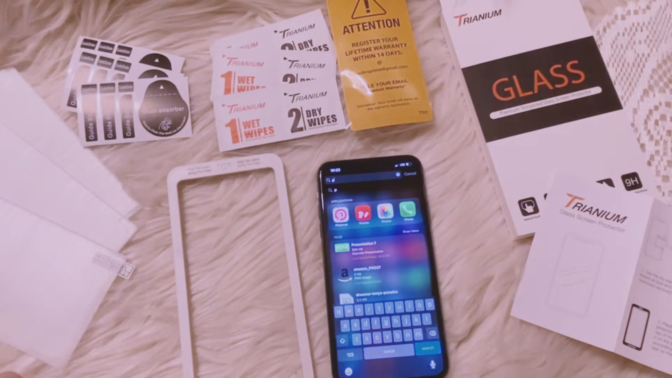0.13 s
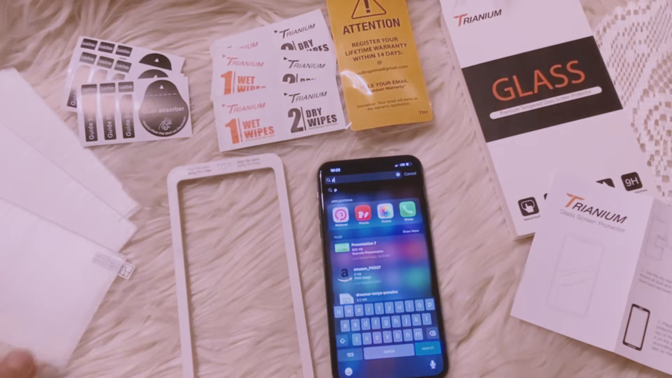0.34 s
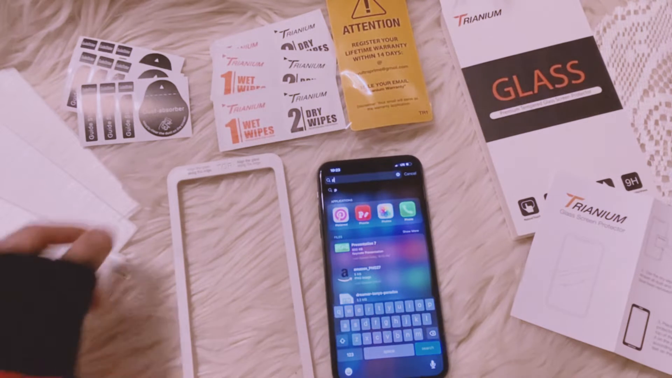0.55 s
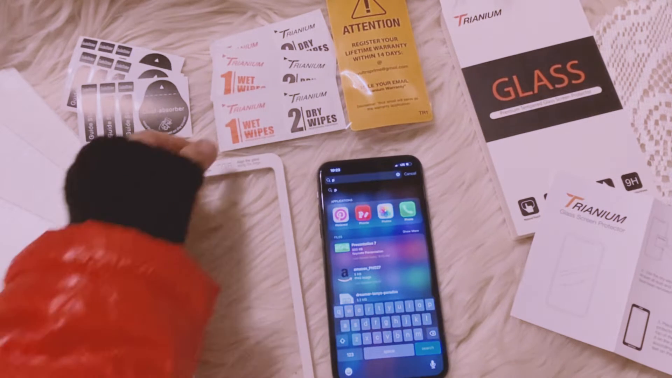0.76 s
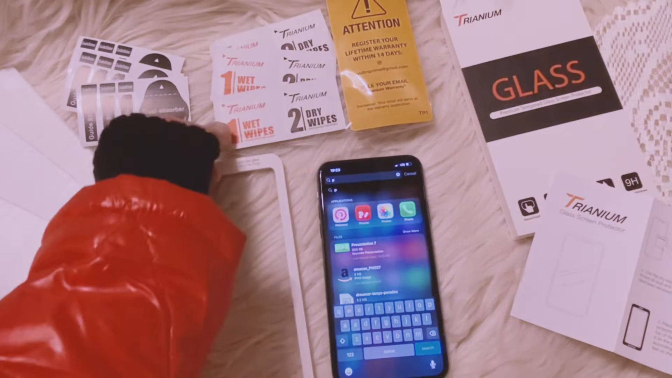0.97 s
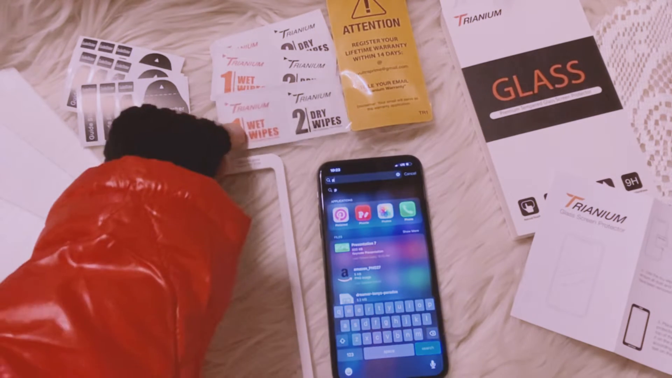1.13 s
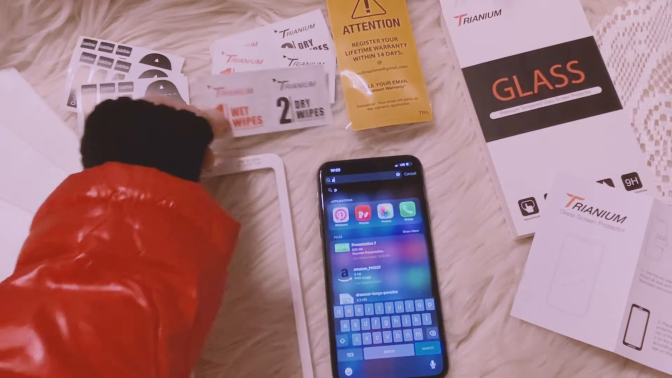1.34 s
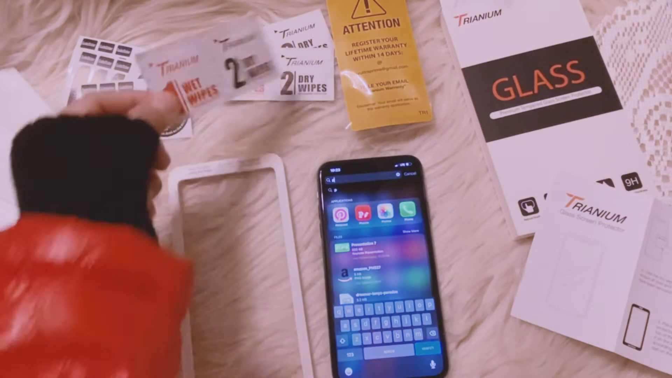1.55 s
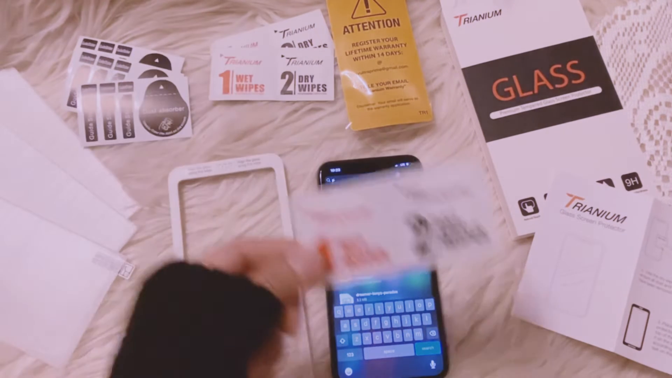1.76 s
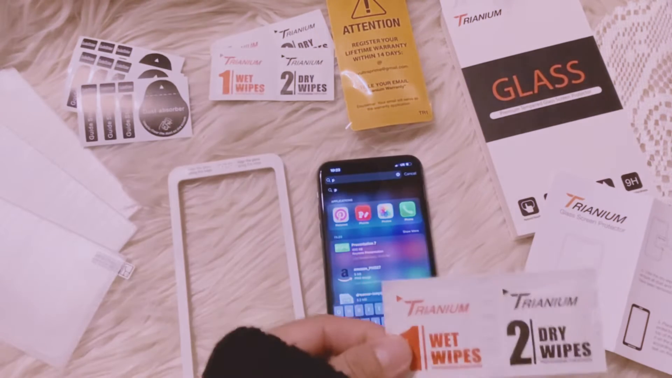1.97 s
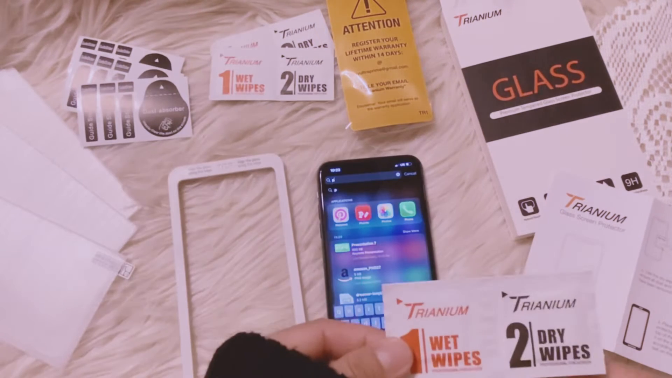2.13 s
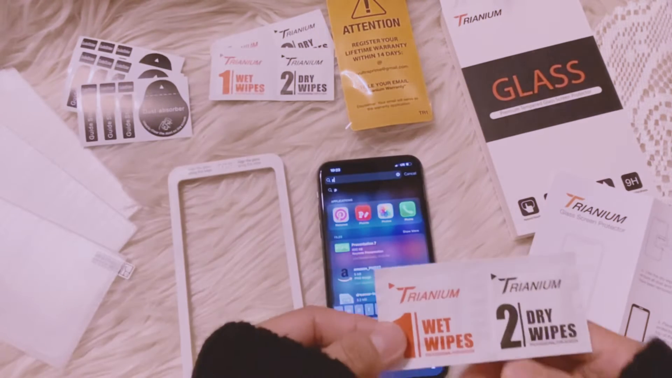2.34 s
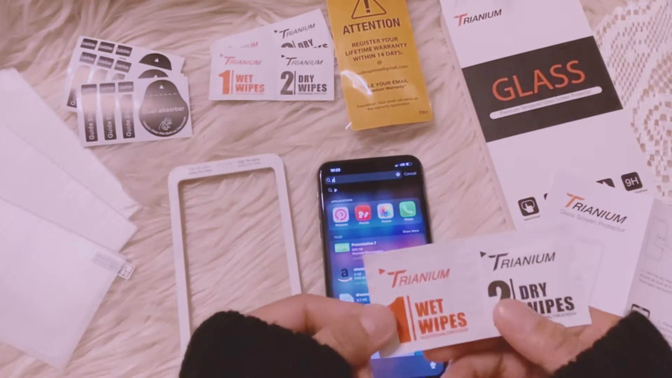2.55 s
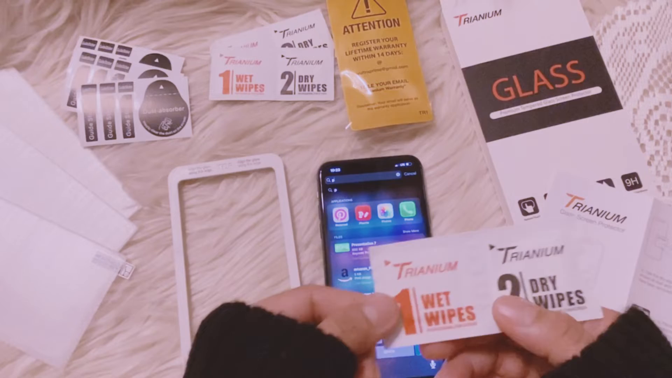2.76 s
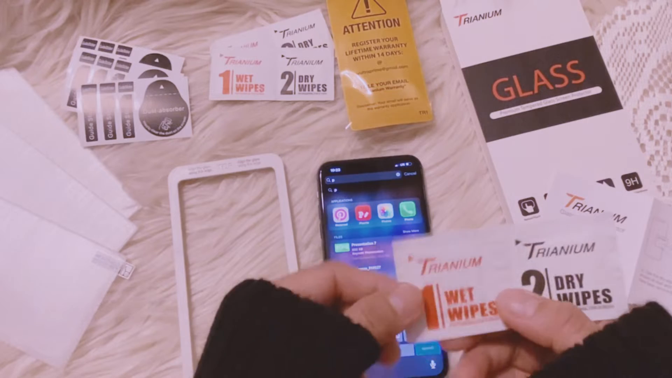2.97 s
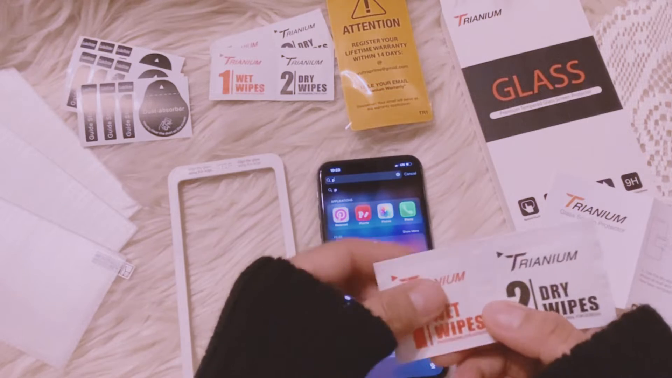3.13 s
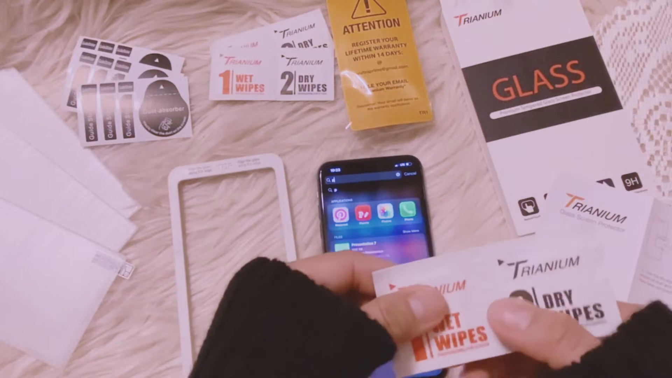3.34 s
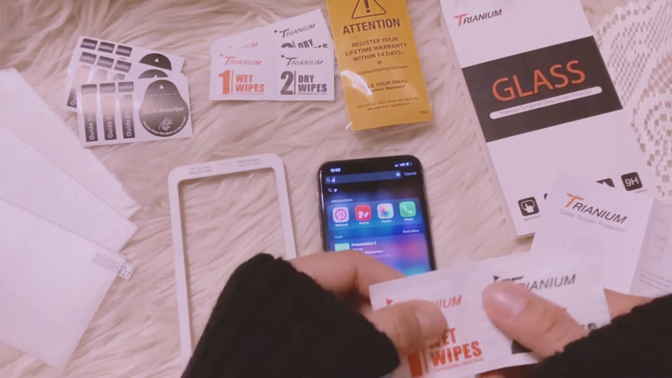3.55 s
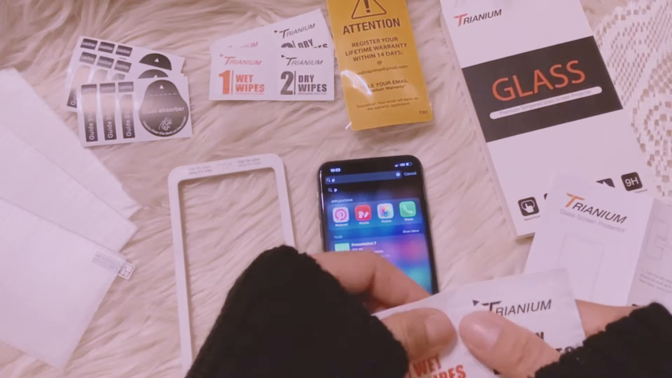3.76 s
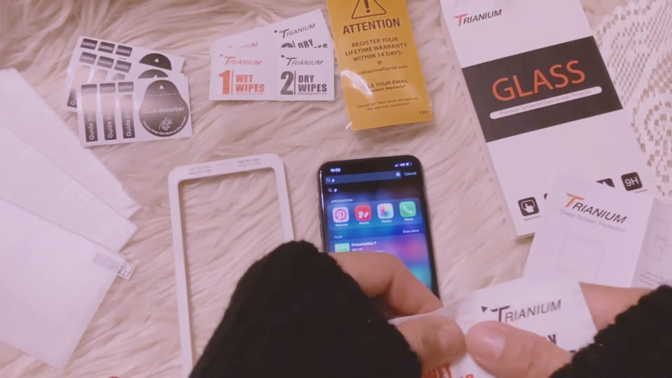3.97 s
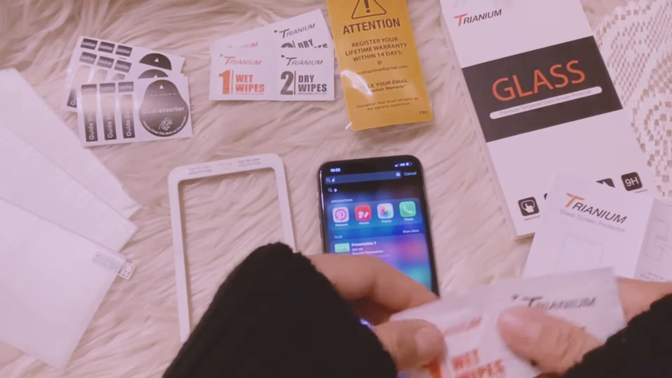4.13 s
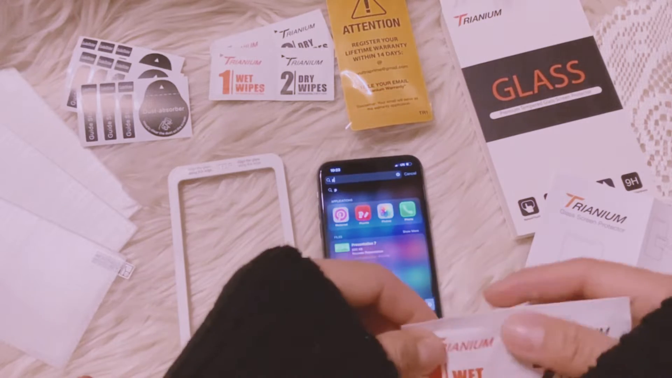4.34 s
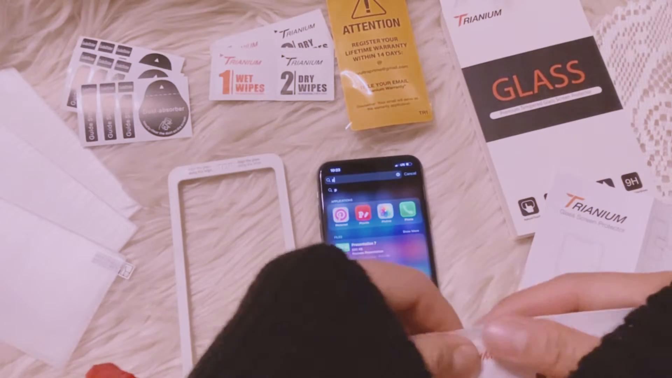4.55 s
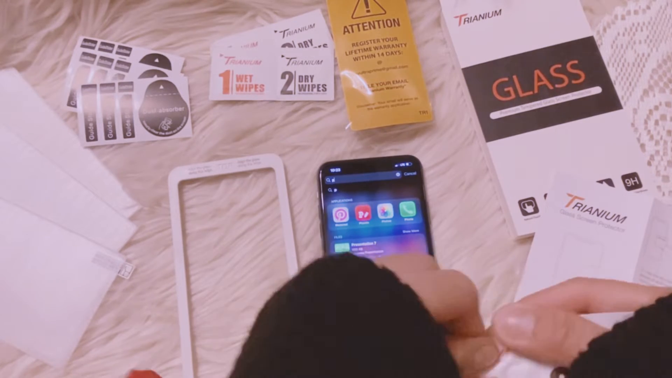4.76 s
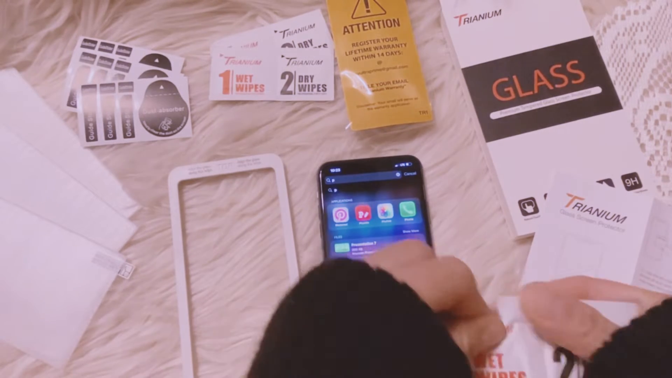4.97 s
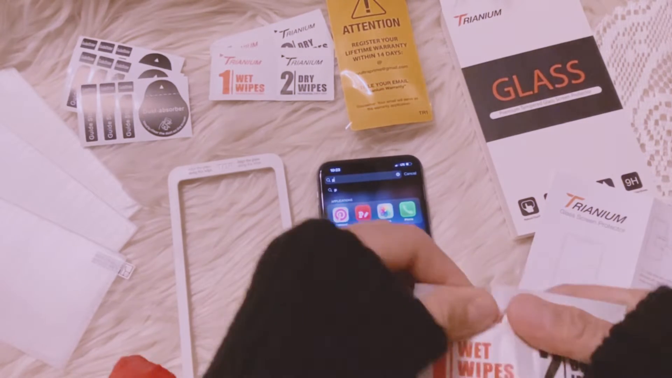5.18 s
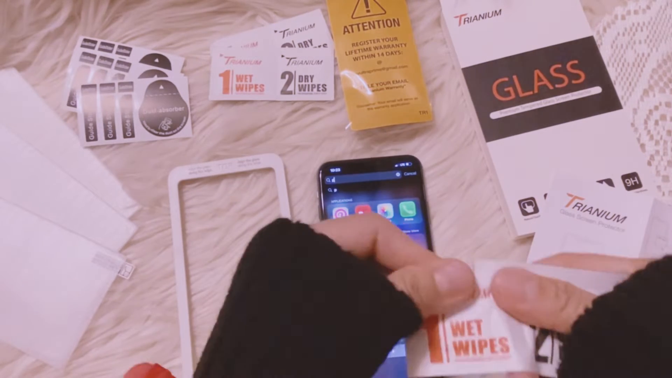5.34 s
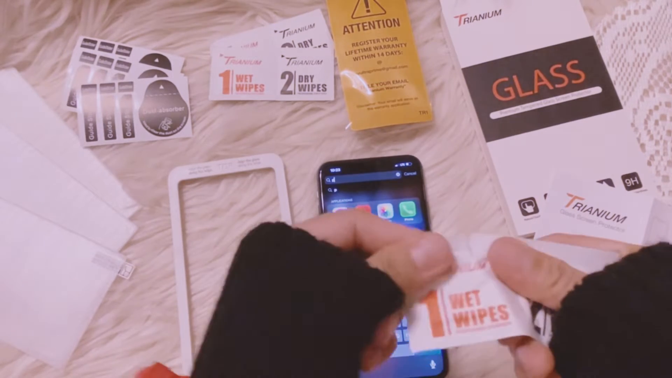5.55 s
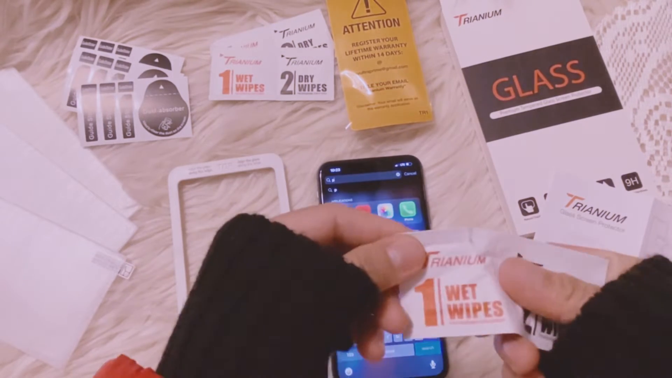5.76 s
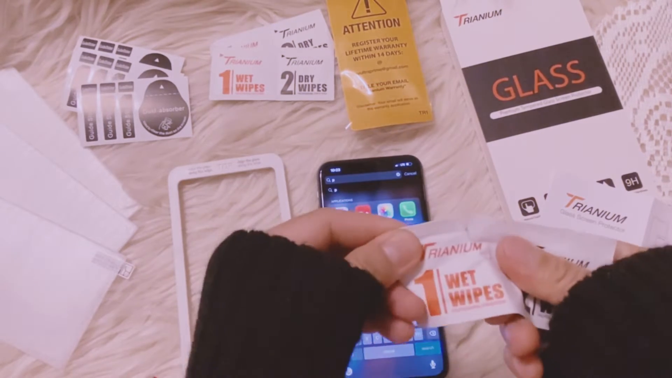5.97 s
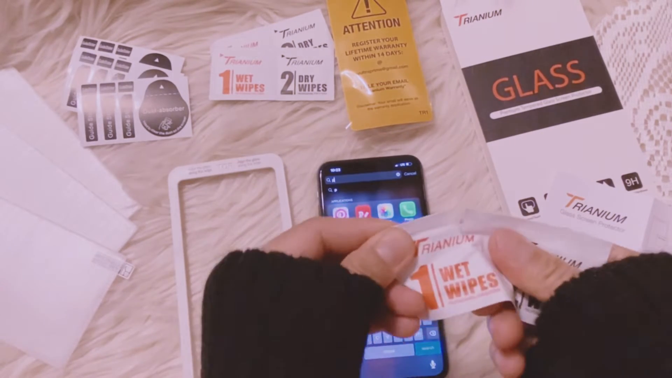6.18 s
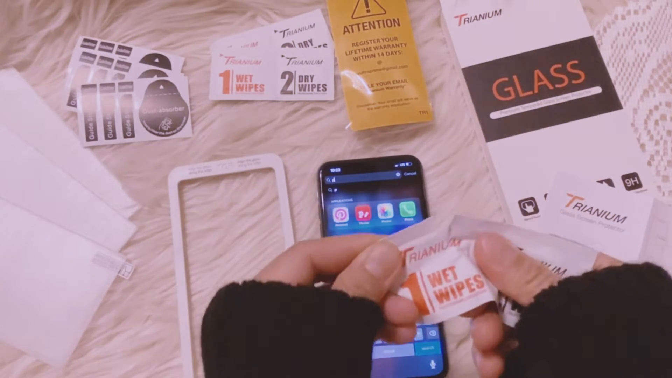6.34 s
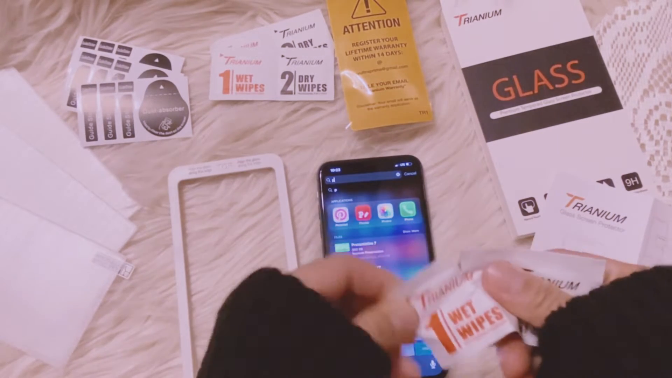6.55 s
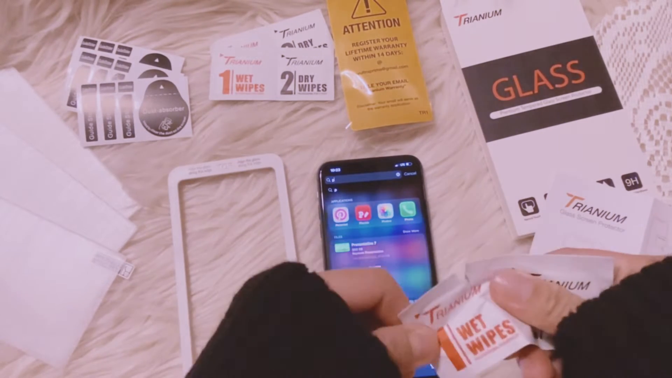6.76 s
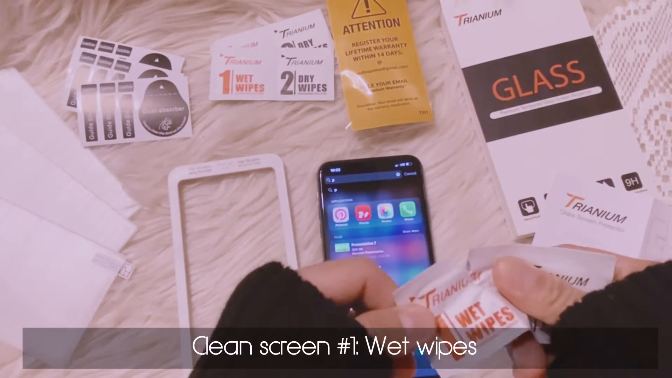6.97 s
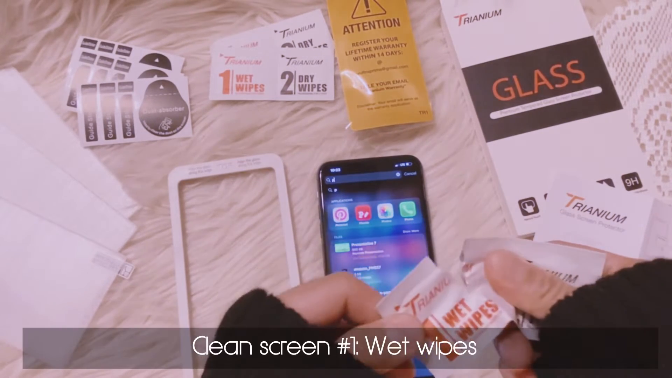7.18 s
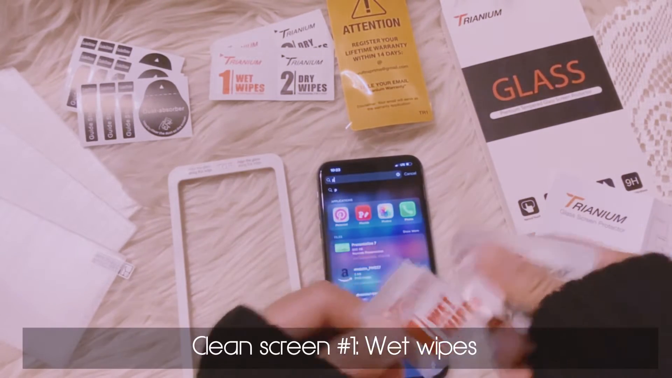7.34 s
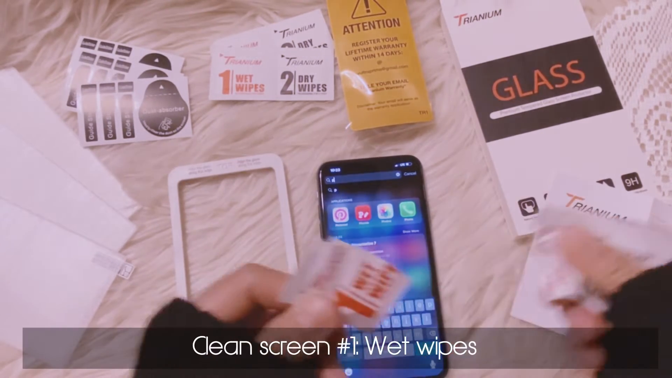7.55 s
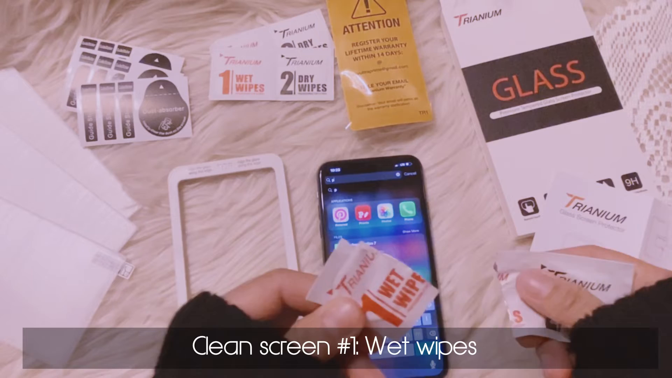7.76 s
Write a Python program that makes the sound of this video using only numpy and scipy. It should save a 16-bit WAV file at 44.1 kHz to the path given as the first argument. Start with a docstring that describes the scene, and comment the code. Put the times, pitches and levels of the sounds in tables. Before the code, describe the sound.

A quiet indoor space holds a low soft rumble and a very faint, slightly wavering mid-low tone throughout. It is nearly still until 0.3 s, when a sleeve and fingers rub softly; a light scrape at about 1.4 s and a fuller brush near 1.6 s mark a packet lifted from a fur rug. Gentle rustling follows. From 2.9 s both hands grip the foil: small crinkles, a few clearer clicks around 3.3-3.7 s, a group at 4.05 s. Sharp, dry snaps strike at 4.7 and 4.9-5.05 s, the strongest with short dull thumps, then another at 5.5 s. From 5.6 to 7 s come quieter, finer, bright crackles and rubbing. A low jolt swells near 7.1 s; at 7.35 s the seam rips in a very brief, loud burst. Crisp ticks at 7.6 s and light rustle end it. Close, with only a tiny diffuse tail.

```python
"""A quiet room rumbles with one thin, slightly wavering tone, low filtered noise and a sine;
close by, hands pick a foil sachet off a fur rug, bend it and rip it open.
Sleeves and fingers rustle (shaped noise), creases snap one by one (damped rings plus cracks),
big folds thump (short sagging sines), the seam tears in a burst (dense impulse runs)
and the pull jolts the air (low noise swells)."""
import sys
import numpy as np
from scipy import signal
from scipy.fft import rfft, irfft
from scipy.io import wavfile
from scipy.ndimage import uniform_filter1d

SR = 44100
rng = np.random.default_rng(int(sys.argv[2]) if len(sys.argv) > 2 else 0)


def store_pcm(level_fs):
    """Save levels as 16-bit WAV."""
    pcm = np.round(np.clip(level_fs, -1, 1) * 32767).astype(np.int16)
    wavfile.write(sys.argv[1], SR, np.atleast_2d(pcm).T)


N = 344421
MID_SIDE = np.array([[1], [-1]])  # sign of the side signal, left and right


# creases snapping: t/s, peak level/dB, panel f/Hz, crack level/dB re panel ring
CREASE_SNAPS = [(2.9743, -27.5, 2950, 0), (3.2887, -22.5, 3080, -2), (3.597, -18.5, 2520, -4.5),
                (3.6429, -20, 2400, -32), (3.665, -32.5, 2450, -30), (3.87, -34.5, 2800, -13),
                (4.0415, -22, 2450, -15), (4.0448, -17.5, 1720, -28), (4.045, -7.5, 4600, -40),
                (4.0539, -21.5, 2320, -28), (4.235, -32, 2360, -23), (4.4194, -18.5, 2380, -34),
                (4.593, -40, 1180, -27), (4.6693, -11.5, 1710, -55), (4.678, -24, 820, -40),
                (4.6908, -1, 3450, 1), (4.793, -18.5, 4050, 5), (4.874, -38, 2090, -28),
                (4.8955, -16.5, 3050, -8), (4.9159, -9.5, 2780, -7), (4.9732, -4.5, 1770, 1.5),
                (5.0268, 3, 3260, 2), (5.062, -17, 2900, 7), (5.17, -27.5, 1670, -30),
                (5.1786, -23, 2300, -8), (5.183, -21.5, 2100, -25), (5.194, -28, 2220, -25),
                (5.213, -29, 1560, -23), (5.417, -24.5, 2240, -33), (5.4679, -6.5, 2330, -52),
                (5.5161, -28.5, 1640, -23), (5.5451, -20, 2930, -23), (5.622, -28.5, 1670, -21),
                (5.75, -31, 1840, -25), (5.765, -32.5, 3150, -29), (5.782, -28, 1220, 1.5),
                (5.868, -29, 6900, 21), (5.933, -39, 2320, -20), (5.942, -37, 2420, -20),
                (5.974, -35.5, 6660, -12), (5.988, -40.5, 1970, -22), (6.0205, -33.5, 6700, 16),
                (6.084, -42.5, 1880, -18), (6.256, -27.5, 6800, 8), (6.445, -32, 4200, -15),
                (6.4547, -28, 2070, -20), (6.5617, -22.5, 1470, 0), (6.5746, -33, 1990, -25),
                (6.686, -34, 4230, 5), (6.865, -31, 5700, 17), (6.898, -32, 6910, 27),
                (6.952, -40, 6500, 21), (7.008, -35, 6500, 14), (7.026, -39, 6500, 12),
                (7.0478, -16.5, 6460, 2), (7.0767, -45, 5200, -21), (7.079, -25.5, 2410, -25),
                (7.102, -21, 2630, -24), (7.136, -22, 6700, 13), (7.213, -36, 6000, 12),
                (7.235, -27.5, 6170, 15), (7.285, -29, 6500, 21), (7.3066, -21.5, 3500, -2),
                (7.3478, 0.5, 4560, 4), (7.361, -6.5, 2090, 10), (7.6057, -14, 3940, 8),
                (7.639, -20, 3440, 9), (7.6455, -20.5, 4840, 12), (7.648, -14, 7450, 8)]
CREEP_LEAD_S, CREEP_SHARE, CREEP_RISE_S = 0.003, 0.33, 0.00065
RING_T60_S, RING_DB_PER_DOUBLING = 0.0041, 48  # T60 of a 0 dB snap; doubles per this many dB softer
UPPER_HZ, UPPER_DB, UPPER_DB_PER_CRACK_DB = 6530, -0.5, 0.65  # small high panel in every snap


def snaps():
    """Each crease creeps, then flips: its panel rings briefly, a crack goes on top."""
    length = 2048
    out, t = np.zeros((2, N + length)), np.arange(length) / SR
    noises = rng.standard_normal((len(CREASE_SNAPS), 3, length))
    after_flip = np.maximum(t - CREEP_LEAD_S, 0)
    creep = CREEP_SHARE * np.exp((t - CREEP_LEAD_S) / CREEP_RISE_S)
    onset = np.where(t < CREEP_LEAD_S, creep, 1)
    for (t_s, peak_db, panel_hz, crack_db), noise in zip(CREASE_SNAPS, noises):
        t60_s = RING_T60_S * 2 ** (-peak_db / RING_DB_PER_DOUBLING)
        fade = np.exp(-np.log(1000) * after_flip / t60_s) * onset
        # splinters come from scattered spots: the two sides differ a little
        scattered = noise[0] + 0.26 * noise[1] * MID_SIDE
        splinter = band(scattered * fade, panel_hz / 2.6, min(1.81 * panel_hz, 8000))
        crack = band(noise[2] * fade, 7500, 15500, order=3)
        x = ring(after_flip, panel_hz, t60_s) + 0.96 * splinter / np.abs(splinter).max()
        upper_db = UPPER_DB + UPPER_DB_PER_CRACK_DB * crack_db
        x = x + undb(upper_db) * ring(after_flip, UPPER_HZ, 0.61 * t60_s)
        # a thin panel moves no air in the bass
        x = band(x, panel_hz / 2.64, 16000, order=3)
        x = x + undb(crack_db) * crack / np.abs(crack).max()
        i = int((t_s - CREEP_LEAD_S) * SR)
        out[:, i:i + length] += undb(peak_db) * x / np.abs(x).max()
    return out[:, :N]


# foil scraping, crumpling or ripping:
# peak t/s, 16 dB rise/s, 16 dB fall/s, level/dB, pitch f/Hz, treble level/dB re mid band
RIP_RUNS = [ (1.385, 0.052, 0.09, -43.5, 1460, -2), (1.446, 0.11, 0.0059, -46.5, 6740, 6.5),
            (3.162, 0.018, 0.013, -44.5, 2550, -12), (4.793, 0.016, 0.037, -42, 3350, 3.5),
            (4.972, 0.016, 0.0085, -29, 2620, -18), (5.028, 0.028, 0.0067, -31.5, 3220, -5),
            (5.19, 0.074, 0.083, -46, 2160, 0), (5.544, 0.033, 0.16, -44.5, 3220, -1.5),
            (5.788, 0.015, 0.038, -42, 2730, -3.5), (6.451, 0.07, 0.054, -41, 1680, -4.5),
            (6.567, 0.026, 0.04, -41, 2800, -25), (7.08, 0.045, 0.073, -38.5, 4650, -28),
            (7.348, 0.032, 0.0058, -32.5, 5250, 2), (7.349, 0.0015, 0.011, -14.5, 3600, 1.5),
            (7.362, 0.0058, 0.0024, -13.5, 3400, -19), (7.368, 0.0024, 0.072, -37, 3450, -11), ]


def rip():
    """Runs of fibre cracks that swell and die, over the flap of the sachet body."""
    cracks = pair(lambda: unit(grains(4000, 2.95)), 0.62)
    out = np.zeros((2, N))
    for peak_s, rise_s, fall_s, level_db, pitch_hz, treble_db in RIP_RUNS:
        start_s, end_s = peak_s - rise_s, peak_s + 2 * fall_s
        a, b = int(start_s * SR), int(end_s * SR)
        swell_db = np.interp(np.arange(a, b) / SR, [start_s, peak_s, end_s], [-16, 0, -32])
        run = cracks[:, a:b]
        mids = unit(band(run, pitch_hz / 2.2, min(2.0 * pitch_hz, 8000)))
        treble = undb(treble_db) * unit(band(run, 4840, 12600))
        # the harder the pull, the more the whole sachet flaps
        body = undb(0.31 * level_db) * unit(band(run.mean(axis=0), 333, 750))
        out[:, a:b] += undb(level_db + swell_db) * (mids + treble + body)
    return out


# sachet body as a big fold gives way: t/s, peak level/dB, starting f/Hz
FOLD_THUMPS = [(2.974, -34.5, 513), (4.0451, -32.5, 445), (4.4199, -24.5, 225), (4.6698, -23, 855),
               (4.6909, -26, 430), (4.9737, -18, 636), (5.027, -16.5, 565), (5.063, -31, 275),
               (5.183, -30.5, 440), (6.4539, -33, 560), (6.575, -27.5, 410), (7.102, -32, 453),
               (7.3468, -15.5, 384), (7.3615, -18.5, 690)]
THUMP_FADE_S, THUMP_SAG_PER_S = 0.00069, 11.6  # 1/e fade; exponential pitch sag rate


def thumps():
    """A dull, short swing whose pitch sags."""
    length = 2048
    out, t = np.zeros(N + length), np.arange(length) / SR
    sagging_t = (1 - np.exp(-THUMP_SAG_PER_S * t)) / THUMP_SAG_PER_S
    for t_s, peak_db, start_hz in FOLD_THUMPS:
        x = np.sin(2 * np.pi * start_hz * sagging_t) * t * np.exp(-t / THUMP_FADE_S)
        i = int(t_s * SR)
        out[i:i + length] += undb(peak_db) * x / np.abs(x).max()
    return out[:N]


SETTLE_DB, SETTLE_DB_PER_SNAP_DB, SETTLE_FADE_S = -39, 0.5, 0.016  # SETTLE_DB: after a 0 dB snap
STRAIN_DB, STRAIN_RISE_S = -3, 0.0083  # level re settling


def settling():
    """Rustle gain as foil strains towards a snap and settles after, more around a loud one."""
    def fade(x, tau_s):
        """Exponential decay, as the motion dies."""
        return signal.lfilter([1], [1, -np.exp(-1 / (tau_s * SR))], x)

    kicks = np.zeros(N)
    t_s, peak_db = np.transpose(CREASE_SNAPS)[:2]
    kicks[(t_s * SR).astype(int)] = undb(SETTLE_DB + SETTLE_DB_PER_SNAP_DB * peak_db)
    strain = fade(kicks[::-1], STRAIN_RISE_S)[::-1]
    return fade(kicks, SETTLE_FADE_S) + undb(STRAIN_DB) * strain


# cloth and skin sliding: t/s, level/dB
RUB_LEVEL = [(0, -73), (0.24, -72), (0.32, -57), (0.45, -48.5), (1.25, -63.5), (1.265, -55.5),
             (1.65, -47.5), (2.17, -58.5), (2.38, -54.5), (2.61, -63.5), (2.74, -56.5), (3.1, -58.5),
             (3.26, -67), (3.3, -55), (3.36, -59.5), (3.4, -52.5), (3.48, -63.5), (3.57, -54), (3.71, -55),
             (3.76, -50), (3.81, -56.5), (3.92, -48), (3.95, -53.5), (4.12, -47), (4.2, -59.5), (4.27, -49),
             (4.62, -55), (4.8, -51.5), (5.32, -51.5), (5.64, -49), (5.71, -57.5), (5.83, -56), (6.08, -61),
             (6.59, -47), (6.67, -59.5), (7.25, -63), (7.62, -55.5), (7.81, -63)]
# hiss spectrum: f/Hz, relative density level/dB
RUB_COLOUR = [(350, -1), (600, -1.5), (926, -5), (2020, -6), (3360, -5.5), (5840, -6.5), (7260, -6.5),
              (8000, -4), (10400, -89)]
# rustle treble against the foil patches: t/s, level/dB
TREBLE_LEVEL = [(0, -11), (0.4, -4), (3.3, -7), (3.7, -7.5), (5.0, -5.5), (5.8, -14), (6.1, 0.5),
                (6.6, -3.5), (7.0, 8.5), (7.5, -4.5), (7.81, -1.5)]
# treble spectrum: f/Hz, relative density level/dB
AIR_COLOUR = [(7000, -11), (7700, -6.5), (12000, 7.5), (14300, 5), (15000, -44)]
# foil panel centres: f/Hz
PANELS_HZ = (750, 1170, 1830, 2860, 4470, 6900)
GRIP_S, TICKS_DB = 2.9, -4  # both hands hold the foil from GRIP_S on; ticks re patches


def rustle():
    """Sliding fibres hiss; once the foil is gripped, the hiss turns patchier and tiny creases tick."""
    grip = np.arange(N) > GRIP_S * SR
    hiss = pair(lambda: unit(shape(rng.standard_normal(N), RUB_COLOUR)), 0.16)
    hiss = hiss * undb([[-1.5], [1.0]])
    # different panels of the foil sing in turn
    log_f, spec = np.log(np.fft.rfftfreq(N, 1 / SR) + 1), rfft(hiss)
    patches, ticks = 0, 0
    for one_panel in np.eye(len(PANELS_HZ)):
        share = np.interp(log_f, np.log(PANELS_HZ), one_panel)
        patches = patches + irfft(spec * share, N) * undb((0.9 + 1.95 * grip) * walk(22))
    for hz in PANELS_HZ[1:]:
        ticks = ticks + unit(band(grains(70, 3.3), hz / 1.47, hz * 2.5)) * undb(2.6 * walk(9.6))
    air = unit(shape(rng.standard_normal(N), AIR_COLOUR))
    mids = unit(patches) + grip * undb(TICKS_DB) * unit(ticks)
    level = np.hypot(undb(curve(RUB_LEVEL)), settling())
    flicker = undb((0.86 + 0.94 * grip) * walk(30))
    return level * flicker * (mids + undb(curve(TREBLE_LEVEL)) * air)


# hands jolting the air and table: t/s, level/dB, hold/s
HAND_JOLTS = [(7.09, -38, 0.075), (7.354, -36, 0.0055), (7.66, -46.5, 0.026)]
JOLT_RISE_DB_PER_S, JOLT_FALL_DB_PER_S = 600, 138


def jolt():
    """Low, uneven wobble as the hands pull apart: a quick swell, a hold, a slower fade."""
    t = np.arange(N) / SR
    swell = 0
    for t_s, level_db, hold_s in HAND_JOLTS:
        rise_db = JOLT_RISE_DB_PER_S * np.maximum(t_s - t, 0)
        fall_db = JOLT_FALL_DB_PER_S * np.maximum(t - t_s - hold_s, 0)
        swell = swell + undb(level_db - rise_db - fall_db)
    return swell * unit(band(rng.standard_normal(N), 47, 114))


# rumble spectrum: f/Hz, relative density level/dB
ROOM_COLOUR = [(25, -68), (49, 4.5), (107, -7), (134, 0), (167, -9), (388, -11.5), (519, -16), (659, -22),
               (1160, -33), (1500, -33.5), (1950, -40), (3300, -120)]
# rumble left-right likeness: f/Hz, correlation
ROOM_LIKENESS = [(60, 0.89), (150, 0.84), (300, 0.44), (650, -0.51), (1500, 0.29)]
ROOM_DB = -50.5
TONE_HZ, TONE_PEAK_DB = 528, -54.5  # centres of slow random wander
TONE_LEFT_RE_RIGHT_DB, TONE_RIGHT_PHASE_RAD = -7, 2.09


def room():
    """Rumble, alike in the bass and less alike higher up, and a thin tone of some appliance."""
    log_f = np.log(np.maximum(np.fft.rfftfreq(N, 1 / SR), 1))
    hz, correlation = np.transpose(ROOM_LIKENESS)
    like = np.clip(np.interp(log_f, np.log(hz), correlation), -1, 1)
    mid, side = (rfft(shape(rng.standard_normal(N), ROOM_COLOUR)) for _ in range(2))
    rumble = irfft(np.sqrt(1 + like) * mid + np.sqrt(1 - like) * side * MID_SIDE, N)
    phase = 2 * np.pi * np.cumsum(TONE_HZ + 1.465 * walk(3)) / SR
    tone = np.sin(phase + np.array([[0], [TONE_RIGHT_PHASE_RAD]]))
    tone = tone * undb(TONE_LEFT_RE_RIGHT_DB / 2 * MID_SIDE)
    rumble = undb(ROOM_DB + 0.5 * walk(1.78)) * unit(rumble)
    return rumble + undb(TONE_PEAK_DB + 2.14 * walk(13)) * tone


def undb(db):
    """Decibels to gain."""
    return 10 ** (np.asarray(db) / 20)


def unit(x):
    """Scale to rms 1."""
    return x / np.sqrt(np.mean(x ** 2))


def band(x, lo_hz, hi_hz, order=2):
    """Butterworth band-pass."""
    sos = signal.butter(order, [lo_hz, min(hi_hz, .45 * SR)], "band", fs=SR, output="sos")
    return signal.sosfilt(sos, x)


def shape(x, table):
    """Colour a steady noise by (f/Hz, level/dB) points."""
    hz, db = np.transpose(table)
    f = np.maximum(np.fft.rfftfreq(x.shape[-1], 1 / SR), 1)
    gain = undb(np.interp(np.log(f), np.log(hz), db, left=-90, right=-90))
    return irfft(rfft(x) * gain, x.shape[-1])


def curve(table):
    """A (t/s, value) table on the sample grid."""
    return np.interp(np.arange(N) / SR, *np.transpose(table))


def walk(rate_hz):
    """Random levels, one per 1 / rate_hz, smoothed twice; rms near 1."""
    k = int(SR / rate_hz)
    steps = np.repeat(rng.standard_normal(N // k + 1), k)
    return unit(uniform_filter1d(uniform_filter1d(steps, k), k)[:N])


def grains(per_s, scatter_db):
    """Random impulses with a tail of louder ones."""
    size = np.minimum(rng.exponential(size=N), 4)
    hits = rng.random(N) < per_s / SR
    return hits * rng.choice([-1, 1], N) * undb(scatter_db * size)


def ring(t, hz, t60_s):
    """One damped swing, peak 1."""
    x = np.sin(2 * np.pi * hz * t) * np.exp(-np.log(1000) * t / t60_s) * (1 - np.exp(-3 * hz * t))
    return x / np.abs(x).max()


def pair(make, likeness):
    """Two channels from a sound maker called twice, with the given correlation."""
    mid = np.sqrt((1 + likeness) / 2) * make()
    return mid + np.sqrt((1 - likeness) / 2) * make() * MID_SIDE


TAIL_DB, TAIL_T60_S = -24, 0.05


def scene():
    """Foil sounds get a short diffuse tail from nearby surfaces; rustle, jolts and room join dry."""
    foil = snaps() + thumps() + rip()
    t = np.arange(8192) / SR
    tail = rng.standard_normal((2, 8192)) * np.exp(-np.log(1000) * t / TAIL_T60_S) * (t > .002)
    tail = band(tail, 200, 1900, order=1)
    tail = undb(TAIL_DB) * tail / np.sqrt((tail ** 2).sum(axis=1, keepdims=True))
    echo = signal.fftconvolve(foil, tail, axes=1)[:, :N]
    return foil + echo + rustle() + jolt() + room()


SPLIT_HZ, SPLIT_WIDTH_HZ, RIGHT_LAG_S, TOP_HZ = 7600, 250, 1 / 6000, 16900


def record(dry):
    """Both channels share the left treble, the right late; peaks are rounded, then the top is cut."""
    f = np.fft.rfftfreq(N, 1 / SR)
    spec = rfft(dry)
    high = 1 / (1 + np.exp(-(f - SPLIT_HZ) / SPLIT_WIDTH_HZ))
    late = np.array([np.ones(len(f)), np.exp(-2j * np.pi * f * RIGHT_LAG_S)])
    both = irfft((1 - high) * spec + high * spec[0] * late, N)
    both = np.tanh(1.15 * both) / 1.15
    top_cut = signal.ellip(14, .2, 110, TOP_HZ, fs=SR, output="sos")
    return signal.sosfilt(top_cut, both)


dry = scene()
out = record(dry)
store_pcm(out)
```